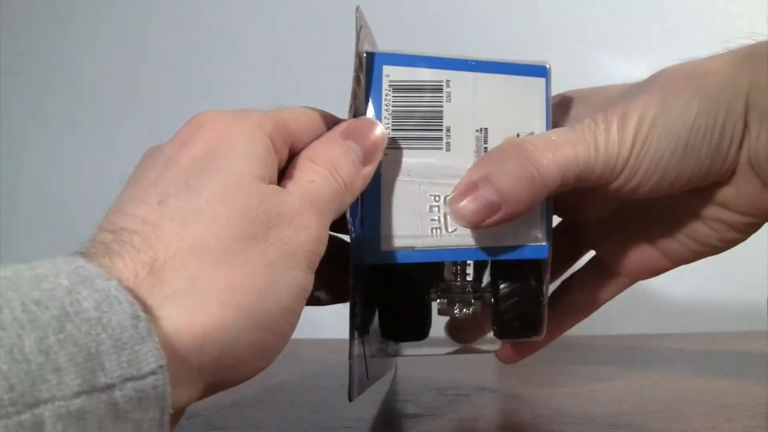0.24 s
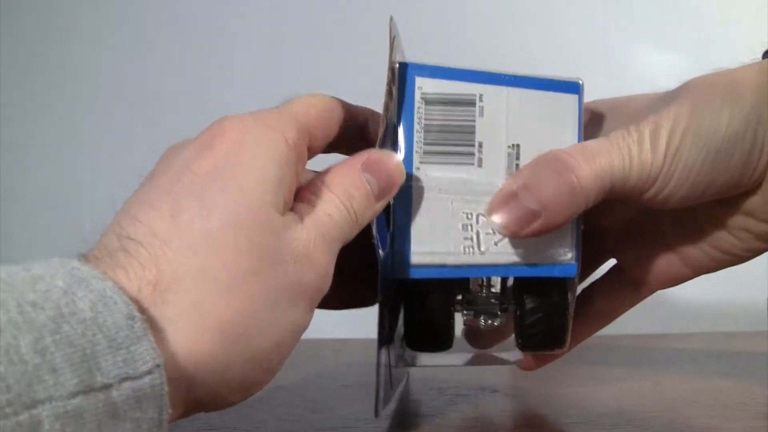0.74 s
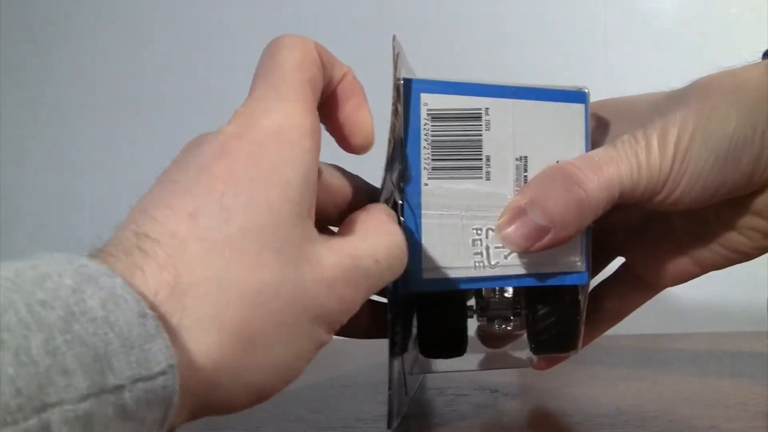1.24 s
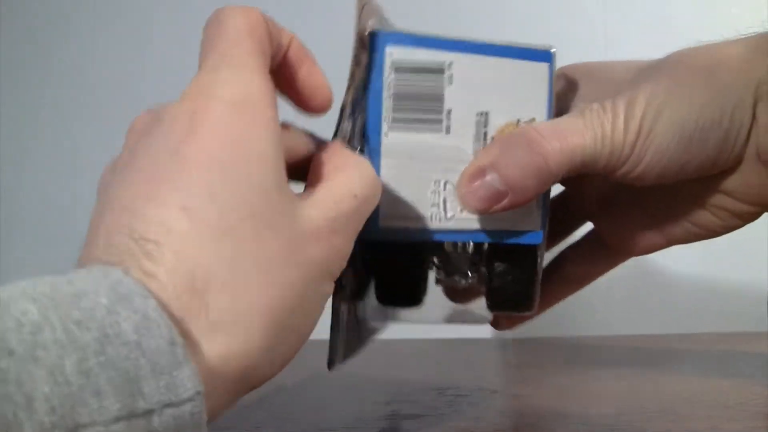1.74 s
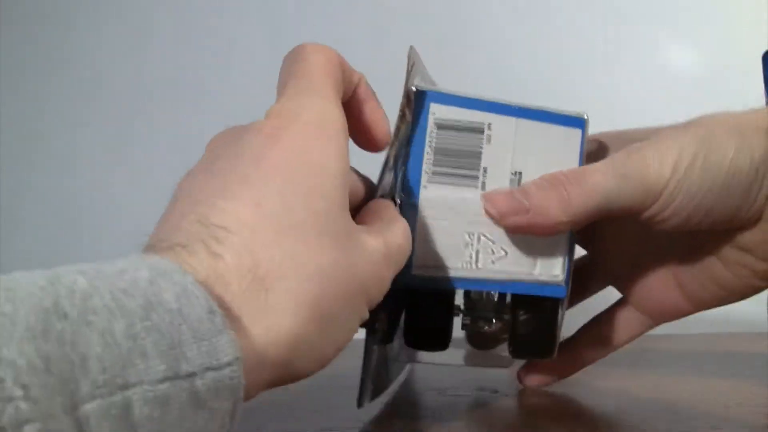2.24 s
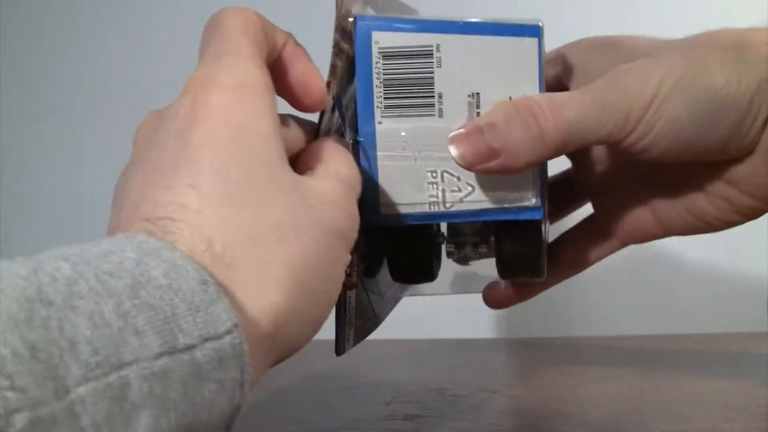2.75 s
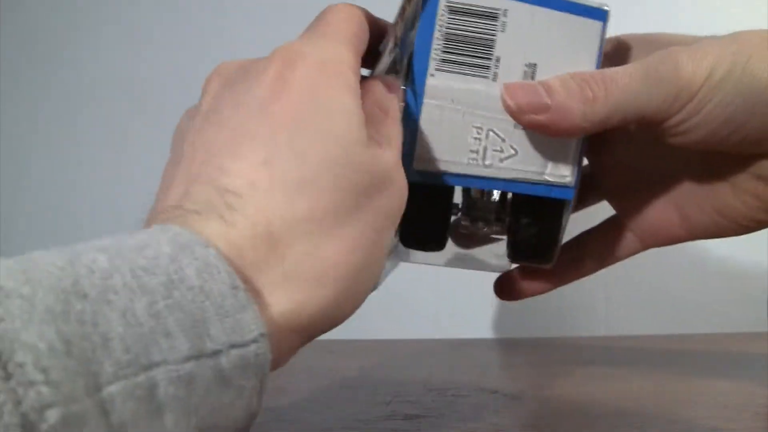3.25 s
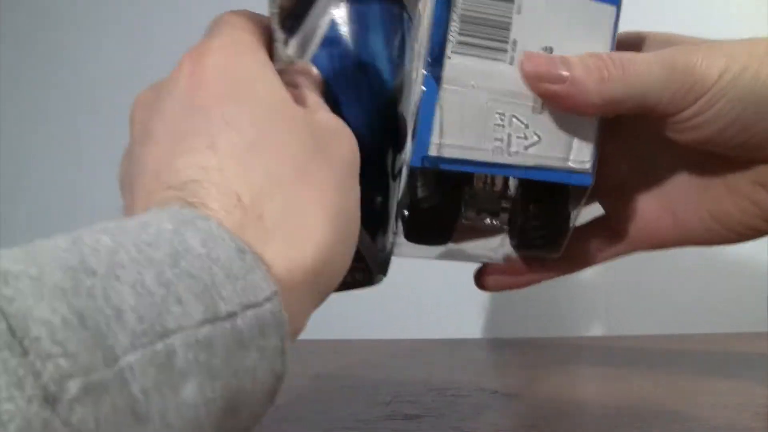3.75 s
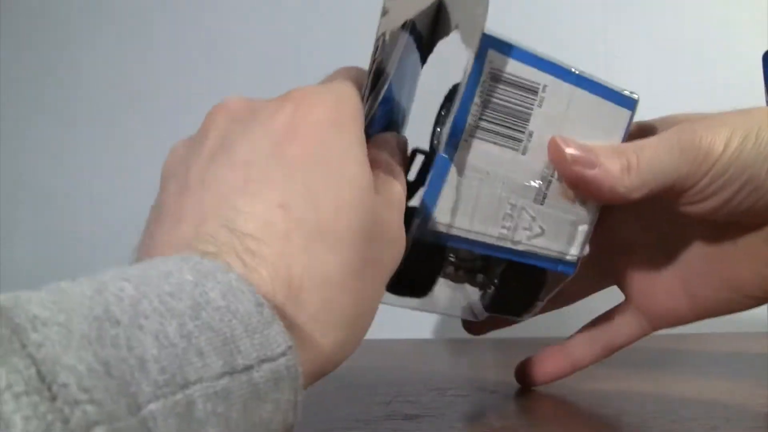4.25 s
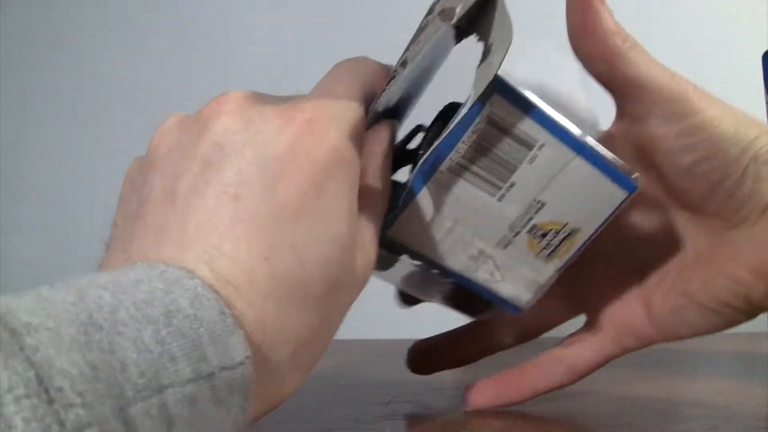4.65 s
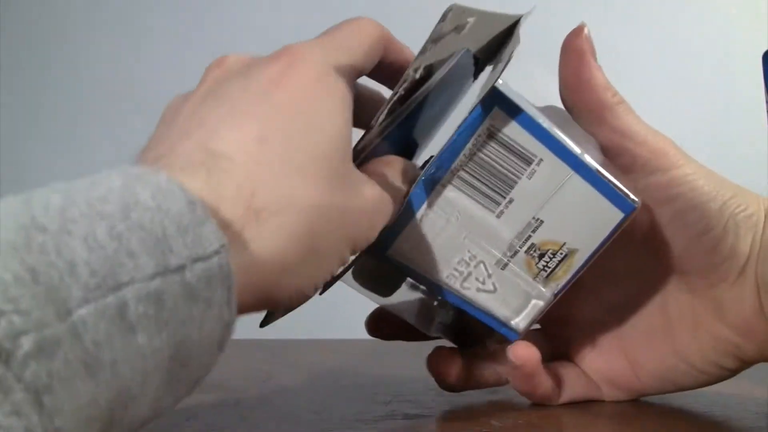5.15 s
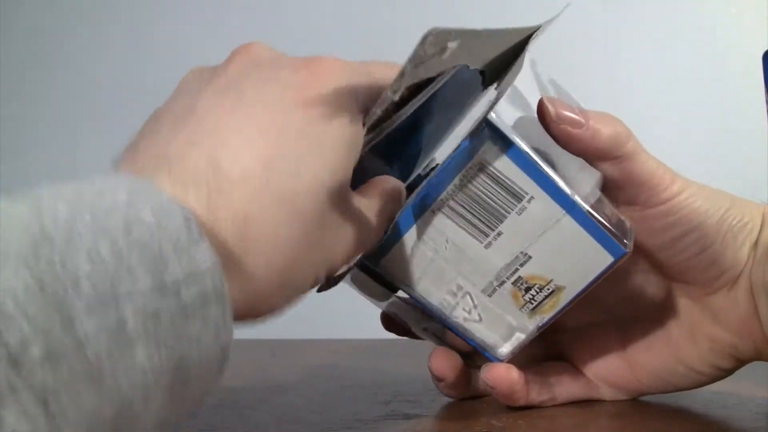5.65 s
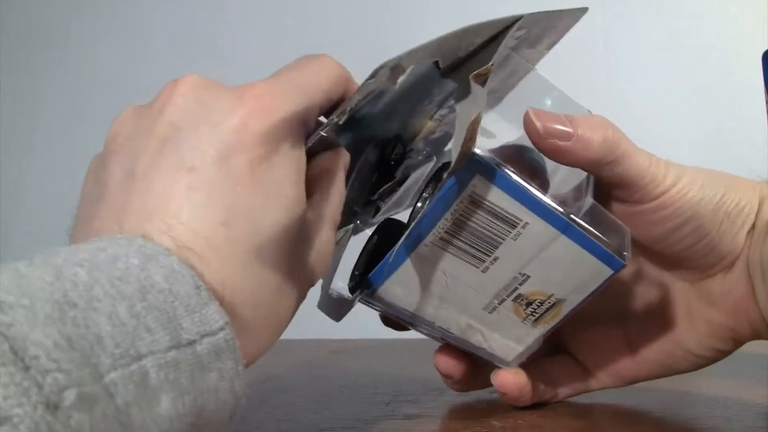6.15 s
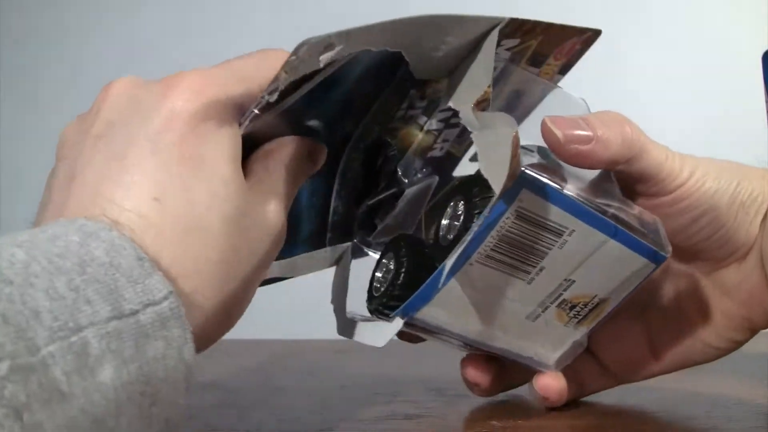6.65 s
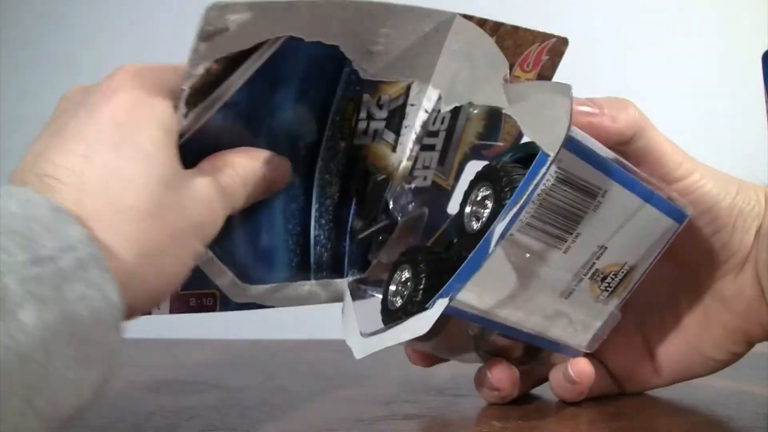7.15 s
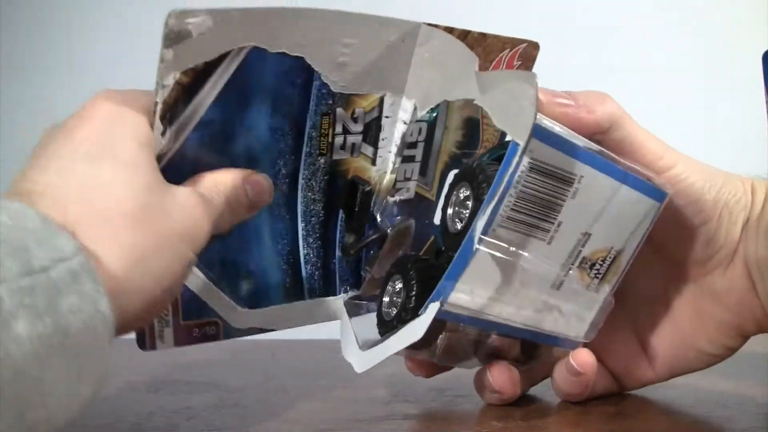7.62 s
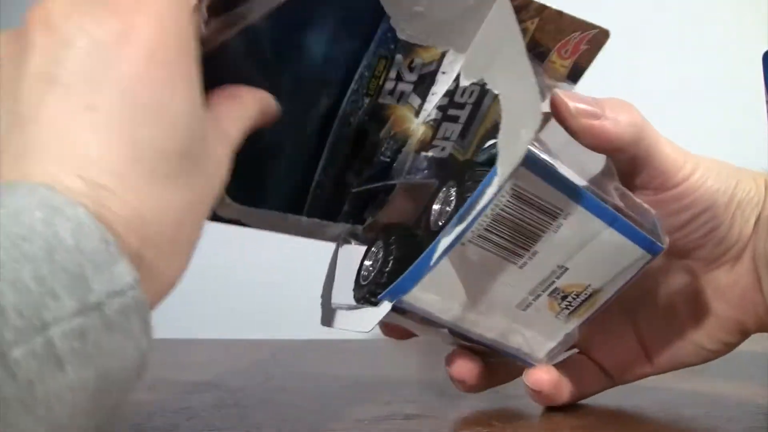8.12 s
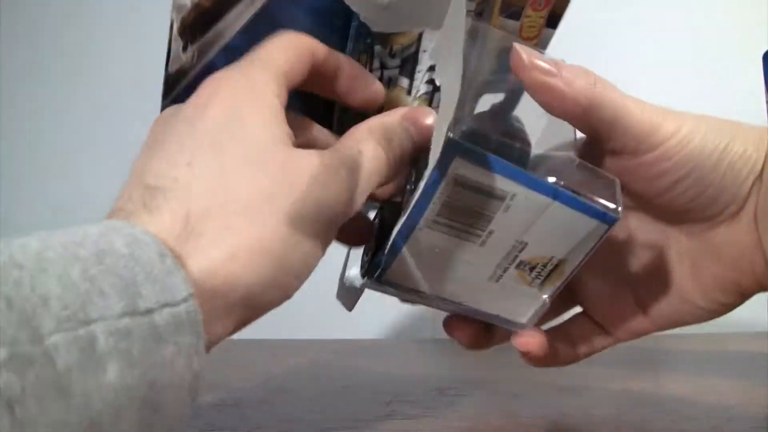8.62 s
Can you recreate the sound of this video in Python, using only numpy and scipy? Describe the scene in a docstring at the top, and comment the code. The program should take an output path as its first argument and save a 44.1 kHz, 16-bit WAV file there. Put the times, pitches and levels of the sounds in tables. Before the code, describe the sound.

Very close stereo pickup of hands opening a plastic and cardboard package in a small, quiet room. Hollow card pops and bright plastic snaps come first, then rubbing, tiny squeaks and creaks, and crackling rips as the glue lets go. Peeling and bending continue unevenly, with faint ticks between, a strong snap with a low puff of air around seven seconds, and a few late pops.

```python
"""Two hands tear the cardboard backing off a plastic blister pack, close to a two-port microphone in a small room.
Pops and snaps come from the start: clicks with dying crackle excite card modes and a broad shell resonance.
Peeling and rubbing run throughout as shaped noise and grains, over faint handling noise that rises and sinks.
Squeaks, gliding harmonic tones, come near 1.7 s and 4.3 s; creaks, trains of slips, begin at 2.0 s.
Glue rips in avalanches of clicks from 2.2 s; of the scattered puffs of air the strongest comes near 7.2 s."""
import sys
import numpy as np
from scipy import signal
from scipy.fft import rfft, irfft
from scipy.io import wavfile

SR = 44100
rng = np.random.default_rng(int(sys.argv[2]) if len(sys.argv) > 2 else 0)


def log_audio(samples):
    """Write samples as a 16-bit WAV file to the path given in sys.argv[1]."""
    # one column per channel
    frames = np.atleast_2d(samples).T
    # limit to full scale, then quantise
    limited = np.clip(frames, -1, 1)
    pcm = np.round(limited * 32767).astype(np.int16)
    wavfile.write(sys.argv[1], SR, pcm)


N = 391608
SECONDS = np.arange(N) / SR
BLOW = SECONDS[:6000]  # time axis of one short blow, 0.136 s long

# Source levels below hold before the pack's long resonances, treble changes and room are added.
# Spectrum of the still room, relative: (frequency [Hz], level [dB])
STILL_AIR_COLOUR = [(30, 2.5), (100, -20), (400, -23), (3000, -2.5), (16000, -13)]
STILL_AIR_DB = -60.5
# Differences between the microphone ports: (frequency [Hz], left over right [dB], left phase lead [rad])
PORT_DIFFERENCES = [(100, .5, 0), (300, 1.2, 0), (1000, .4, -.07), (2700, 0, -.13), (7000, .2, -.07),
                    (9000, -.8, -.33), (10300, -3.4, 0), (12300, 1.5, .65), (13800, 2.1, .1)]
ROOM_T60_S, WALL_CUT_HZ = 0.21, 5000
ROOM_DB = -13.5  # gain of the unit-energy tails, before their sum is halved
CUTOFF_HZ = 16200

# Air pushed out as the pack gives way: (time [s], peak level [dB])
AIR_PUFFS = [(1.491, -52), (3.69, -46), (6.057, -43), (6.491, -51), (6.876, -46), (7.162, -19),
             (8.222, -47)]
# Slow level of the faint handling noise: (time [s], drive level [dB])
HANDLING_LEVEL = [(0, -40.5), (.55, -49.5), (1.15, -45.5), (1.33, -56.5), (1.68, -54.5), (1.9, -45.5),
                  (2.45, -39.5), (2.68, -53), (3.05, -46), (4.2, -45.5), (4.85, -42.5), (5.25, -47),
                  (5.7, -43.5), (6.2, -51.5), (7.2, -51), (7.36, -62), (7.7, -49.5), (8.05, -45.5),
                  (8.88, -41)]
HANDLING_THUD_DB, HANDLING_SHELL_DB, HANDLING_HISS_DB = -8.5, -7, -16.5  # relative to the card's part
# Gain of the top octave: (time [s], gain [dB])
TOP_OCTAVE_GAIN = [(0, 0.5), (2, -2.5), (2.7, 0.5), (4, -5.5), (4.9, -4.5), (5.7, -2), (6.5, 6.5),
                   (7.5, 0.5), (8.88, -5)]

# Card and the hollow behind it, before tilt, scatter and damping: (frequency [Hz], gain [dB], t60 [s])
CARD_RESONANCES = [(135, -25.5, 0.03), (186, -10, 0.053), (248, -9.5, 0.07), (327.4, 1, 0.06),
                   (406.5, 3, 0.08), (472, 2.5, 0.064), (558, -9, 0.16), (625, 7.5, 0.038), (670, 5, 0.074),
                   (743.4, 4.5, 0.069), (847, 11, 0.032), (996, 6, 0.023), (1120, 6.5, 0.024),
                   (1332, 10, 0.013)]
# Whole pack, ringing on after every sound: (frequency [Hz], gain [dB], t60 [s])
PACK_RESONANCES = [(303, -9, .1), (395, -13, .2), (550, -5, .35), (689, -11, .25), (1650, -9, .02),
                   (3215, -14, .05), (4122, -7, .02), (7161, -11, .04)]
# Spectrum of sharp cracks: (frequency [Hz], gain [dB])
CRACK_COLOUR = [(3000, 19), (4500, 9), (5600, -0.5), (7400, 8), (10200, 8), (12500, 1.5), (14000, -5.5),
                (16000, -37)]
# Spectrum of rubbing: (frequency [Hz], gain [dB])
FRICTION_COLOUR = [(29, -77), (50, -36), (103, -29), (371, 4.5), (408, -0.5), (483, 2.5), (661, 7.5),
                   (1330, -8.5), (1820, -11.5), (2440, -15), (3100, -14), (5670, -26.5), (9640, -23),
                   (12300, -26), (16000, -40.5)]
# Ranges in which the parts of the pack radiate: (low [Hz], high [Hz])
THUD_HZ, FLEX_HZ, SHELL_HZ, CRACK_HZ = (76, 290.6), (320, 1302), (1304, 4560), (4310, 18300)

# Skin sticking and slipping on plastic; the level precedes the swell:
# (time [s], length [s], start [Hz], end [Hz], level [dB], fall per harmonic [dB], pitch roughness [0-1])
SKIN_SQUEAKS = [(1.724, 0.06, 452, 480, -25.5, 34, 0.07), (2.029, 0.062, 725, 866, -21, 4, 0.07),
                (2.083, 0.043, 557, 625, -20.5, 5, 0.07), (4.276, 0.035, 741, 900, -21, 12, 0.19),
                (4.345, 0.021, 700, 840, -21.5, 17, 0.1)]
# Card creaking as it is bent back, lasting at most one BLOW; levels spread energy over 10 ms:
# (time [s], length [s], slip rate [1/s], card level [dB], shell level [dB], shell pitch [Hz])
FOLD_CREAKS = [(2.043, 0.03, 117, -41, -13.5, 2900), (2.8, 0.075, 80, -21, -32.5, 1850),
               (4.332, .08, 68, -18, -43, 1950), (4.805, .12, 45, -38, -39, 2400),
               (5.751, 0.05, 100, -15, -25, 1780), (7.739, 0.16, 190, -21, -25.5, 1670)]

# Card's top layer peeling off the glue; body means card and shell:
# (time [s], length [s], hiss drive [dB], growth over the stroke [dB], body relative to hiss [dB])
CARD_PEELS = [(0.062, .15, -45, 0, -3), (0.257, 0.13, -44, 7, -2), (0.836, 0.087, -43, 2, 5.5),
              (1.184, 0.028, -38, -16, 1), (1.374, .11, -40.5, 24, 0.5), (1.493, 0.091, -43.5, 2, -3),
              (2.346, 0.14, -45.5, 3, 2.5), (2.75, 0.074, -48, 8, 1), (2.904, 0.12, -53.5, 10, -2),
              (3.298, .16, -37, 16, 3), (3.473, 0.24, -50, 33, -5), (3.72, 0.038, -24, -12.5, 1),
              (3.79, 0.18, -47, 15, -5), (4.793, 0.13, -43.5, 10, 3), (5.768, 0.31, -38, 7, 3),
              (6.198, 0.13, -45.5, 5, -2.5), (6.343, .14, -35.5, 1.5, -0.5),
              (6.523, 0.025, -37.5, 2.5, 1.5), (6.634, 0.039, -40, -2, 1), (6.769, 0.031, -40.5, 5, 5),
              (6.871, 0.3, -46, 0, 1.5), (7.387, .14, -43, 11, -3), (7.532, 0.063, -33, 2, -4),
              (7.796, 0.22, -40.5, -6.5, 1), (8.268, 0.23, -47, -8, 1.5)]
PEEL_THUD_DB, PEEL_FLEX_DB = -14, 0  # relative to the body
PEEL_ATTACK_S, PEEL_RELEASE_S = 0.0052, 0.019
# Fingers dragging over the pack and bending it:
# (time [s], length [s], thud drive [dB], card drive [dB], shell drive [dB])
FINGER_RUBS = [(1.722, 0.035, -44.5, -35.5, -42.5), (1.91, 0.014, -58, -29, -48),
               (2.021, 0.045, -65.5, -27.5, -31), (2.15, 0.057, -36, -33, -38),
               (2.192, .1, -33.5, -24.5, -33), (2.296, 0.031, -50, -37, -41), (2.483, .06, -46, -28.5, -45),
               (2.776, 0.063, -43, -27, -34.5), (3.423, 0.054, -55, -25.5, -31.5),
               (3.736, 0.083, -46, -36, -47), (3.917, .11, -32.5, -32.5, -39), (4.274, 0.14, -42, -25, -36),
               (4.442, 0.1, -37.5, -35, -40.5), (4.59, 0.062, -56, -37, -40.5),
               (4.726, 0.2, -37.5, -34, -40.5), (5.104, 0.063, -42, -32.5, -38.5),
               (5.498, 0.02, -30.5, -40, -48), (5.569, 0.094, -39, -29, -37.5),
               (5.717, 0.11, -35, -38, -39), (6.09, 0.067, -66, -42, -45), (7.546, 0.018, -56, -28, -28.5),
               (7.741, 0.153, -31, -33.5, -38.5), (8.08, 0.026, -37, -30.5, -33.5),
               (8.199, 0.056, -30, -21.5, -29.5), (8.664, 0.032, -62, -40, -58)]
RUB_HISS_DB = -10.5  # fibre hiss relative to the shell
RUB_ATTACK_S, RUB_RELEASE_S = 0.0068, 0.018
SWAY_HZ, SWAY_SHARPNESS, SWAY_DB = 99.5, 4.5, -15.5  # pack rocking in the hands; level relative to thud
CRACKLES_PER_S, CRACKLE_SPREAD_DB, CRACKLE_SHARE = 490, 4.5, 0.4  # single fibres breaking in the rubbing

# Card buckling under the fingers; levels spread energy over 10 ms:
# (time [s], card level [dB], card tilt [dB/octave], shell level [dB])
CARD_POPS = [(0.051, -19.5, 3.5, -26.5), (0.1751, -18.5, 2.5, -34.5), (0.2713, -14.5, 1.5, -27.5),
             (0.362, -16, -4, -25.5), (0.4915, -23.5, -4, -46), (0.6124, -11.5, -4, -23),
             (0.655, -11.5, -3, -23), (0.824, -12, -1.5, -23.5), (0.9612, -9.5, -4.5, -30),
             (1.1711, -28, -6.5, -71), (1.8031, -19.5, 12, -27.5), (1.859, -29, -3, -39),
             (2.1804, -23.5, 10, -29), (2.2541, -13, -1.5, -40), (2.4186, -15.5, -3, -50),
             (2.4919, -20, -4, -24.5), (2.5039, -13, 30, -15.5), (2.519, -17.5, -6.5, -30),
             (2.7752, -17, -4, -45), (2.9884, -29.5, -3, -52), (3.0304, -29, -8.5, -47),
             (3.1765, -26.5, 26, -31), (3.5709, -26.5, 4, -37.5), (3.942, -20.5, 1, -24.5),
             (4.0169, -24.5, 34, -24.5), (4.142, -30, 25, -34), (4.3801, -22, -3, -24),
             (4.5235, -25.5, -1, -29.5), (4.6056, -24.5, 1, -39), (4.641, -18.5, -4.5, -33.5),
             (5.1365, -24, 7, -24), (5.1563, -22.5, -0.5, -40), (5.363, -29.5, 0.5, -54),
             (5.4034, -29.5, 1, -40), (5.6964, -24.5, 5, -53), (6.0558, -9.5, 2.5, -28),
             (6.1092, -15.5, 6.5, -22.5), (6.8761, -14, 8, -60), (7.2426, -15, 0.5, -23),
             (7.5751, -27.5, 6, -26), (7.8643, -19.5, -7.5, -51), (7.8989, -16, 9, -26),
             (8.0343, -27, -3, -39), (8.1112, -28.5, 28, -28.5), (8.221, -13.5, -4.5, -15.5),
             (8.231, -15, -6, -46), (8.4661, -23.5, 1, -35.5), (8.6629, -23, 21, -23.5),
             (8.7808, -28.5, 7.5, -59)]
POP_PITCH_HZ, POP_CRACK_DB = 1764, -16.5  # shell's answer; crease's crack relative to the shell
# Settling t60 at zero tilt, and its exponential shrinking per dB/octave: small bright flexes settle faster
POP_RING_S, POP_RING_PER_TILT = 0.036, 0.024
# Plastic crease flipping with a bright snap; levels spread energy over 10 ms:
# (time [s], card level [dB], shell level [dB], shell pitch [Hz], crack level [dB])
CREASE_SNAPS = [(0.125, -25, -28, 2850, -24), (0.3178, -27.5, -27.5, 2700, -21),
                (0.397, -35, -49, 2100, -35), (1.2099, -27.5, -15, 4000, -14.5),
                (1.2156, -32, -21.5, 2030, -20.5), (1.429, -30, -25.5, 3700, -27.5),
                (1.4877, -14.5, -21.5, 2760, -24), (2.768, -45, -33, 2820, -39),
                (2.89, -30, -22.5, 3260, -22.5), (2.8958, -18.5, -16.5, 3060, -24.5),
                (3.4128, -30, -31, 2800, -28), (5.6387, -21.5, -30, 2760, -30),
                (5.9098, -26, -27, 3020, -31.5), (6.03, -20.5, -19.5, 2550, -24),
                (6.4055, -19.5, -40, 2100, -28.5), (6.4443, -26.5, -42, 2140, -27),
                (6.4903, -35, -23.5, 3040, -22), (6.7093, -32.5, -29, 3200, -22.5),
                (7.1625, -10, -13.5, 2600, -23), (7.856, -44, -28.5, 2600, -31.5),
                (7.874, -40, -25.5, 2840, -31.5), (7.9328, -47, -33.5, 2550, -30.5),
                (7.987, -48, -44, 2700, -33)]
SNAP_TILT_DB, SNAP_RING_S = 5.5, 0.016  # card tilt per octave: mostly high modes; fast settling t60
POP_CLICK, SNAP_CLICK = 2.56, 5  # first click relative to the crackle's undecayed rms
# Glue seam letting go; levels spread energy over 10 ms: (time [s], length [s], card level [dB],
# card tilt [dB/octave], shell level [dB], shell pitch [Hz], crack level [dB])
GLUE_RIPS = [(2.21, 0.017, -12, 13, -13.5, 2090, -59), (2.272, 0.005, -18, -1, -15.5, 2170, -51),
             (3.685, 0.023, -7, 5, -14.5, 2820, -10.5), (3.714, 0.029, -14.0, 3, -18.5, 2200, -22),
             (5.563, 0.011, -8.5, 2, -18, 1950, -26), (6.039, 0.0096, -19.5, 9, -21, 2280.0, -22.5),
             (6.063, 0.0074, -21, 31, -20.5, 1930, -21), (7.123, 0.041, -21.5, -1, -25.5, 2780, -24)]


def from_db(db):
    """Level principle: 20 dB is a tenfold amplitude."""
    return 10 ** (np.asarray(db) / 20)


def rms_one(x):
    """Power normalization: scale to unit rms."""
    return x / np.sqrt(np.mean(x ** 2) + 1e-20)


def at_level(x, db):
    """Energy normalization: a short sound's energy, spread over 10 ms, gets this level."""
    return from_db(db) * x * np.sqrt(SR / 100 / (np.sum(x ** 2) + 1e-20))


def decay(t, t60_s):
    """Exponential damping: amplitude falls by 60 dB in t60."""
    return np.exp(-np.log(1000) * t / t60_s)


def add(track, s, sound):
    """Superposition: add a sound to the track at its time."""
    start = max(round(s * SR), 0)
    track[start:start + len(sound)] += sound[:N - start]


def over_time(points):
    """Linear interpolation of a time course."""
    return np.interp(SECONDS, *np.transpose(points))


def at_hz(points, hz, column=1):
    """Interpolation on a logarithmic frequency axis."""
    table = np.array(points)
    return np.interp(np.log(hz), np.log(table[:, 0]), table[:, column])


def butterworth(x, order, hz, kind="band"):
    """Frequency selection with a maximally flat passband."""
    return signal.sosfilt(signal.butter(order, hz, kind, fs=SR, output="sos"), x)


def resonate(x, hz, sharpness):
    """Simple resonance: one damped mode, as sharp as its quality factor."""
    return signal.lfilter(*signal.iirpeak(hz, sharpness, fs=SR), x)


def response(colour, band_hz, order=5, size=2048):
    """Minimum phase: causal impulse response of a colour within a band."""
    hz = np.abs(np.fft.fftfreq(size, 1 / SR)) + 1
    low_skirt = 1 + (band_hz[0] / hz) ** (2 * order)
    high_skirt = 1 + (hz / band_hz[1]) ** (2 * order)
    log_gain = np.log(from_db(at_hz(colour, hz)) / np.sqrt(low_skirt * high_skirt) + 1e-5)
    # the Hilbert transform of the log gain gives the phase
    return np.fft.ifft(np.exp(np.conj(signal.hilbert(log_gain)))).real[:size // 2]


def through(x, impulse):
    """Linear response: convolution with an impulse response."""
    return signal.fftconvolve(x, impulse)[:len(x)]


def drift(rate):
    """Random modulation: smooth chance with rms 1."""
    knots = rng.standard_normal(N // 20)
    return rms_one(np.interp(SECONDS * rate, np.arange(len(knots)), knots))


def grains(per_s, spread_db, size):
    """Impulsive noise: random clicks, many small and a few large; rms 1."""
    heights = from_db(spread_db * np.minimum(rng.exponential(1, size), 4))
    signed = heights * rng.choice([-1, 1], size)
    return rms_one(signed * (rng.random(size) < per_s / SR))


def still_air():
    """Stationary noise: the coloured floor of the quiet room."""
    hiss = through(rng.standard_normal(N), response(STILL_AIR_COLOUR, (20, 16000)))
    return from_db(STILL_AIR_DB) * rms_one(hiss)


def room(x, gap_s=0.0044, apart=0.85):
    """Reverberation: a short dull decaying tail, largely different at the two close ports."""
    t = SECONDS[:SR // 2]
    dull = np.exp(-2 * np.pi * WALL_CUT_HZ / SR)
    echoes = rng.standard_normal((2, len(t))) * (t > gap_s) * decay(t, ROOM_T60_S)
    tails = signal.lfilter([1], [1, -dull], echoes)
    mid, side = [through(x, tail / np.sqrt(np.sum(tail ** 2))) for tail in tails]
    return from_db(ROOM_DB) * np.array([mid + apart * side, mid - apart * side]) / 2


def puffs(push_s=0.0033):
    """Volume displacement: one slow push of air and its return, with no net flow."""
    out = np.zeros(N)
    u = BLOW / push_s
    push = u * (1 - u / 2) * np.exp(-u)
    for s, db in AIR_PUFFS:
        add(out, s, from_db(db) * push / push.max())
    return out


def handling():
    """Slow modulation: level of the faint handling noise through time, in dB."""
    return over_time(HANDLING_LEVEL)


def ticks(per_s=34, level_db=-56, ring_s=0.011, follows_handling=0.95):
    """Stress release: strained plastic ticks faintly, more strongly where the handling noise rises."""
    ring = rng.standard_normal(len(BLOW)) * decay(BLOW, ring_s)
    force = grains(per_s, 7.0, N) * from_db(follows_handling * handling())
    sound = through(force, through(ring, response(CRACK_COLOUR, (4500, 15000))))
    return from_db(level_db) * rms_one(sound)


def wander(x, moves_per_s=45, lowest_hz=8700):
    """Intensity panning: the crackle shifts its spot, so treble favours now one port, now the other."""
    treble = butterworth(x, 4, lowest_hz, "high")
    return from_db(-8) * treble * drift(moves_per_s) * np.array([[1], [-1]])


def brighten(x, from_hz=10500):
    """Spectral modulation: the top octave slowly swells and fades."""
    top = signal.sosfiltfilt(signal.butter(3, from_hz, "high", fs=SR, output="sos"), x)
    return x + (from_db(over_time(TOP_OCTAVE_GAIN)) - 1) * top


def ringing_on(x, dip_hz=2520, dip_width_hz=500, dip_share=0.39):
    """Parallel resonance: narrow modes ring on; a broad dip softens the sound around 2.5 kHz."""
    dip = dip_share * resonate(x, dip_hz, dip_hz / dip_width_hz)
    modes = sum(from_db(db) * resonate(x, hz, np.pi * hz * t60 / np.log(1000))
                for hz, db, t60 in PACK_RESONANCES)
    return modes - dip


def squeaks():
    """Stick-slip: a fingertip slips almost regularly, giving a short gliding tone with harmonics."""
    out, waver = np.zeros(N), drift(600)
    for s, length, start_hz, end_hz, db, fall_db, roughness in SKIN_SQUEAKS:
        along = np.linspace(0, 1, round(length * SR))
        glide_hz = start_hz + (end_hz - start_hz) * along
        hz = glide_hz * (1 + roughness * waver[round(s * SR):][:len(along)])
        phase = 2 * np.pi * np.cumsum(hz) / SR
        tone = sum(from_db(-fall_db * k) * np.sin((k + 1) * phase) for k in range(5))
        add(out, s, from_db(db) * rms_one(tone) * np.sin(np.pi * along))
    return out


def creaks(jitter=0.12):
    """Stick-slip: nearly regular slips along a fold kick card and shell."""
    out = np.zeros(N)
    for s, length, per_s, card_level, shell_level, pitch_hz in FOLD_CREAKS:
        turns = np.cumsum(per_s * (1 + jitter * drift(203)[:len(BLOW)])) / SR
        # each completed turn is one slip
        force = np.diff(np.floor(turns), prepend=-1) * (BLOW < length)
        add(out, s, at_level(card(force, 0, 1), card_level))
        add(out, s, at_level(shell(force, pitch_hz, sharpness=6.6), shell_level))
    return out


def stroke(length, attack_s, release_s, growth_db=0):
    """Amplitude envelope: attack, a hold that may grow or fade, and release."""
    t = SECONDS[:SR]
    hold = from_db(growth_db * (np.minimum(t / length, 1) - .5))
    return np.minimum(t / attack_s, 1) * hold * np.exp(-np.maximum(t - length, 0) / release_s)


def effort():
    """Power addition: handling, peels and rubs together drive thud, card, shell and fibre hiss."""
    handling_parts_db = (HANDLING_THUD_DB, 0, HANDLING_SHELL_DB, HANDLING_HISS_DB)
    powers = [from_db(handling() + db) ** 2 for db in handling_parts_db]
    for s, length, hiss_db, growth_db, body_db in CARD_PEELS:
        shape = stroke(length, PEEL_ATTACK_S, PEEL_RELEASE_S, growth_db)
        relative_db = (body_db + PEEL_THUD_DB, body_db + PEEL_FLEX_DB, body_db, 0)
        for power, db in zip(powers, relative_db):
            add(power, s, (from_db(hiss_db + db) * shape) ** 2)
    for s, length, thud_db, card_db, shell_db in FINGER_RUBS:
        shape = stroke(length, RUB_ATTACK_S, RUB_RELEASE_S)
        for power, db in zip(powers, (thud_db, card_db, shell_db, shell_db + RUB_HISS_DB)):
            add(power, s, (from_db(db) * shape) ** 2)
    return np.sqrt(powers)


def bending(x, band_hz, depth_db, changes_per_s=22, count=8):
    """Shifting resonance: as the sheet bends, each slice of the band swells on its own."""
    edges = np.geomspace(*band_hz, count + 1)
    # neighbouring slices take independent noises
    slices = [butterworth(x[k % 2], 2, pair) for k, pair in enumerate(zip(edges, edges[1:]))]
    gains = from_db(depth_db * np.array([drift(changes_per_s) for _ in slices]))
    return np.sum(slices * gains, axis=0) / np.sqrt(np.mean(gains ** 2, axis=0))


def knocks(drive, per_s, tilt_db, level_db, spread_db=3.0):
    """Impact excitation: while it is bent, the card gives way in small hollow knocks."""
    return from_db(level_db) * drive * rms_one(card(grains(per_s, spread_db, N), tilt_db, 1))


def pulling(slips_per_s=330, slip_spread_db=5.5, slip_s=0.0028, flutter_db=1.35):
    """Friction noise: tiny slips and breaking fibres, over a smooth rub, drive every part of the pack."""
    # each slip is a burst that decays by 1/e in slip_s
    slips = rms_one(through(np.abs(grains(slips_per_s, slip_spread_db, N)), np.exp(-BLOW / slip_s)))
    smooth_share = 0.6
    friction = np.hypot(slips, smooth_share) * from_db(flutter_db * drift(70))
    drives = effort()
    crackle = CRACKLE_SHARE * grains(CRACKLES_PER_S, CRACKLE_SPREAD_DB, N)
    sway_band_hz = SWAY_HZ * np.exp(np.array([-.5, .5]) / SWAY_SHARPNESS)
    sway = butterworth(rng.standard_normal(N), 2, sway_band_hz)
    out = from_db(SWAY_DB) * drives[0] * rms_one(sway)
    out = out + knocks(drives[0], per_s=70, tilt_db=-21, level_db=-6.5)
    out = out + knocks(drives[1], per_s=110, tilt_db=0, level_db=-4.5)
    bands = (THUD_HZ, FLEX_HZ, SHELL_HZ, CRACK_HZ)
    rub_levels_db, shifts_db = (-2.5, -2.5, -0.95, -0.44), (4.3, 1.7, 3.0, 3.1)
    for band_hz, drive, rub_db, shifting_db in zip(bands, drives, rub_levels_db, shifts_db):
        force = friction * rng.standard_normal((2, N))
        fibres = butterworth(crackle, 2, band_hz)
        rubbing = bending(force, band_hz, shifting_db) + fibres
        sound = through(rubbing, response(FRICTION_COLOUR, (40, 17000)))
        out = out + from_db(rub_db) * drive * rms_one(sound)
    return out


def card(force, tilt_db, damping, scatter_db=1.0):
    """Modal excitation: a wide flex favours the card's low modes, a small one the high."""
    hz, db, t60 = np.transpose(CARD_RESONANCES)[:, :, None]
    # each sound draws its mode levels and signs at random
    mode_db = db + tilt_db * np.log2(hz / hz.mean()) + scatter_db * rng.standard_normal(hz.shape)
    gain = from_db(mode_db) * rng.choice([-1, 1], hz.shape)
    modes = gain * np.sin(2 * np.pi * hz * BLOW) * decay(BLOW, t60 / damping)
    # the card's part keeps no deep bass below about 125 Hz
    return butterworth(through(force, np.sum(modes, axis=0)), 5, 125, "high")


def shell(force, pitch_hz, sharpness=2.64, low_hz=1200, high_hz=5200):
    """Broad resonance: its pitch depends on the size of the patch of plastic that flips."""
    return butterworth(resonate(force, pitch_hz, sharpness), 3, [low_hz, high_hz])


def buckles(after_share=0.26, free_ring_s=0.035, rip_fall_s=0.0069, rip_click=8.8):
    """Snap-through buckling: pops, snaps and rips shake the card, the shell and the sharp crease."""
    out, crease = np.zeros(N), response(CRACK_COLOUR, CRACK_HZ)

    def plastic(force, shell_level, pitch_hz, crack_level):
        """Parallel radiation by the shell and its crease."""
        crack = at_level(through(force, crease), crack_level)
        return at_level(shell(force, pitch_hz), shell_level) + crack

    def flip(card_level, tilt_db, shell_level, pitch_hz, crack_level, ring_s, first_click):
        """Bistability: the crease flips with one click, then settles in a dying crackle."""
        click = first_click * (BLOW == 0)
        settling = grains(8300, 1.0, len(BLOW)) * decay(BLOW, ring_s)
        damping = np.clip(np.sqrt(free_ring_s / ring_s), .8, 2)
        body = at_level(card(click + after_share * settling, tilt_db, damping), card_level)
        return body + plastic(click + settling, shell_level, pitch_hz, crack_level)

    for s, card_level, tilt_db, shell_level in CARD_POPS:
        ring_s = POP_RING_S * np.exp(-POP_RING_PER_TILT * tilt_db)
        crack_level = shell_level + POP_CRACK_DB
        add(out, s, flip(card_level, tilt_db, shell_level, POP_PITCH_HZ, crack_level, ring_s, POP_CLICK))
    for s, card_level, shell_level, pitch_hz, crack_level in CREASE_SNAPS:
        add(out, s, flip(card_level, SNAP_TILT_DB, shell_level, pitch_hz, crack_level,
                         SNAP_RING_S, SNAP_CLICK))
    for s, length, card_level, tilt_db, shell_level, pitch_hz, crack_level in GLUE_RIPS:
        # a rip starts with a click and runs on as an avalanche of breaking fibres
        fall = np.exp(-np.maximum(BLOW - length, 0) / rip_fall_s)
        force = rip_click * (BLOW == 0) + grains(5000, 2.4, len(BLOW)) * fall
        add(out, s, at_level(card(force, tilt_db, 1), card_level))
        add(out, s, plastic(force, shell_level, pitch_hz, crack_level))
    return out


def scene():
    """Superposition: the pack with its ringing, stereo treble and room, then puffs and still air."""
    pack = brighten(buckles() + pulling() + squeaks() + creaks() + ticks())
    pack = pack + ringing_on(pack)
    return pack + wander(pack) + room(pack) + puffs() + still_air()


def record(dry):
    """Transduction: two ports colour the treble differently, peaks overload and the top is cut."""
    hz = np.fft.rfftfreq(N, 1 / SR) + 1
    # each port takes half of the level and phase difference
    half_phase = 0.5 * at_hz(PORT_DIFFERENCES, hz, column=2)
    half = from_db(at_hz(PORT_DIFFERENCES, hz) / 2) * np.exp(1j * half_phase)
    heard = irfft(rfft(dry) * np.array([half, 1 / half]), N)
    top_cut = signal.ellip(10, .1, 70, CUTOFF_HZ, fs=SR, output="sos")
    return signal.sosfilt(top_cut, np.clip(heard, -1, 1))


dry = scene()
out = record(dry)
log_audio(out)
```